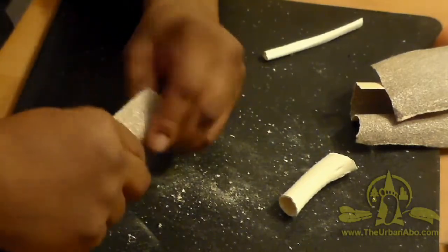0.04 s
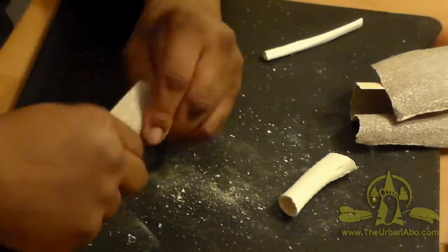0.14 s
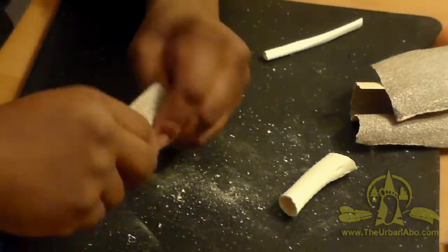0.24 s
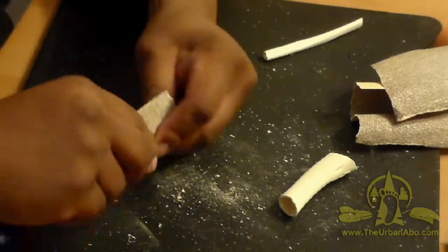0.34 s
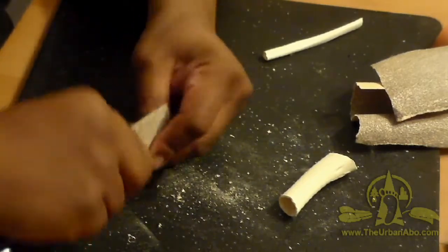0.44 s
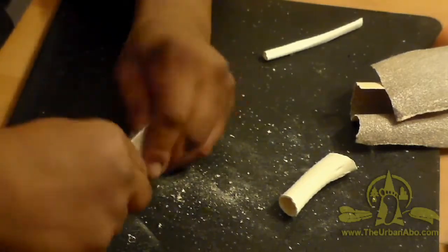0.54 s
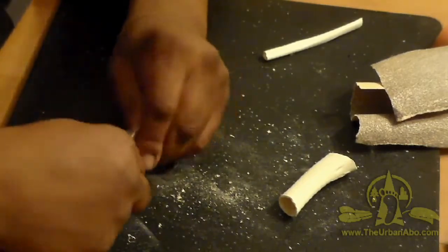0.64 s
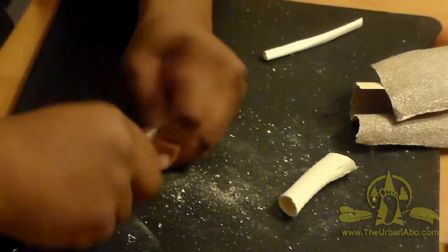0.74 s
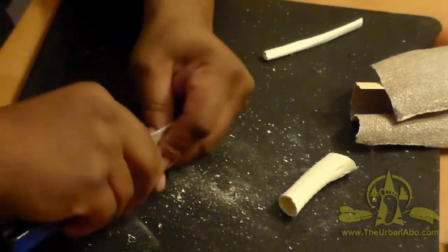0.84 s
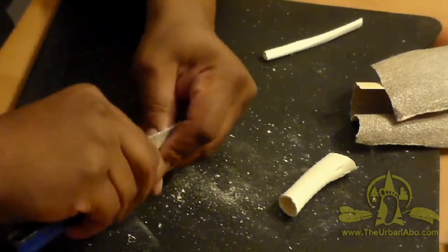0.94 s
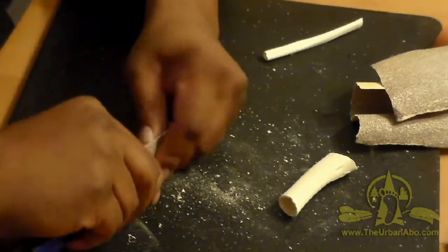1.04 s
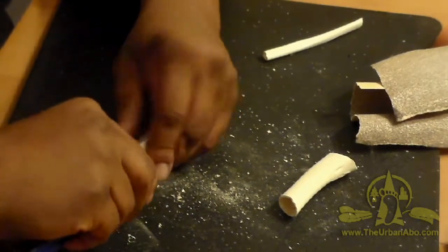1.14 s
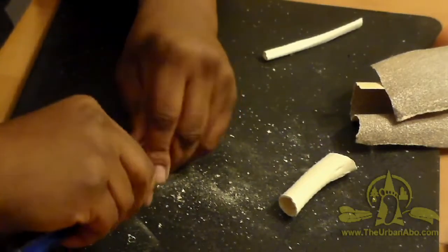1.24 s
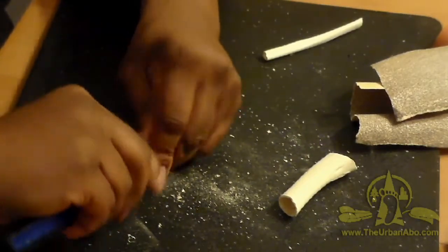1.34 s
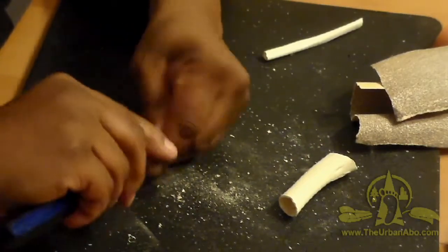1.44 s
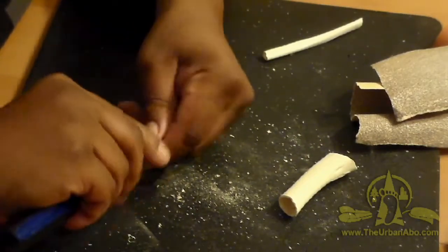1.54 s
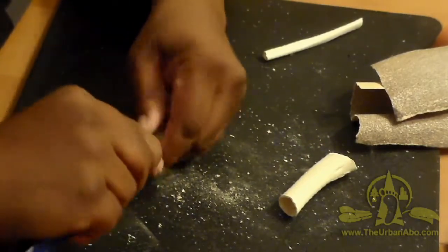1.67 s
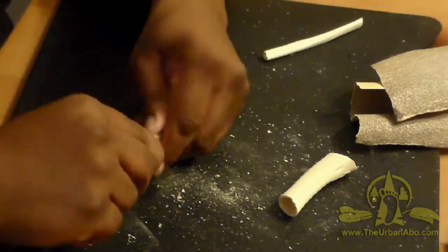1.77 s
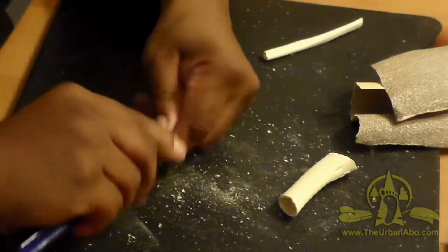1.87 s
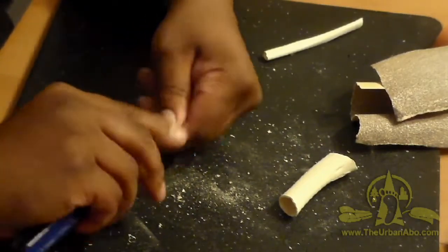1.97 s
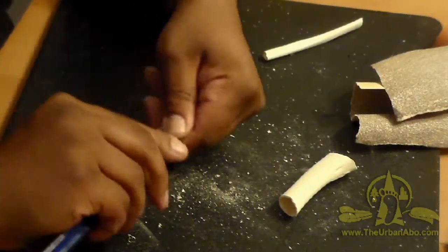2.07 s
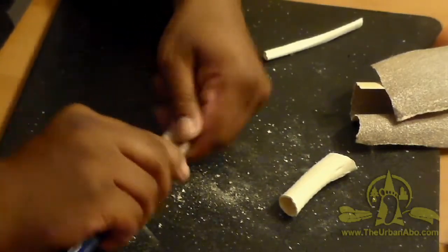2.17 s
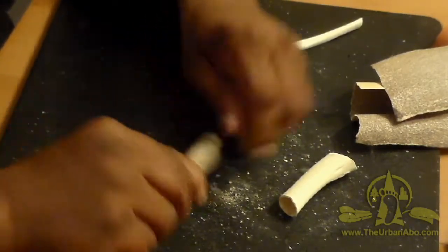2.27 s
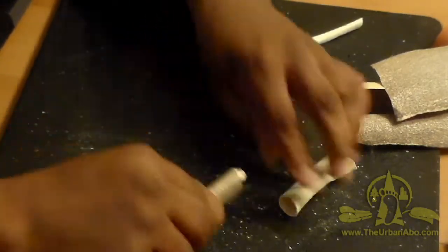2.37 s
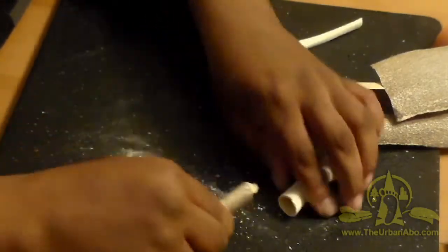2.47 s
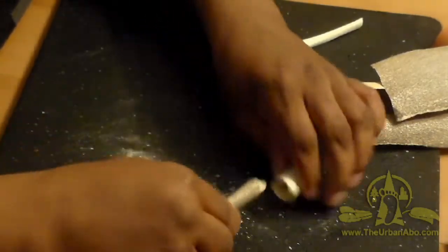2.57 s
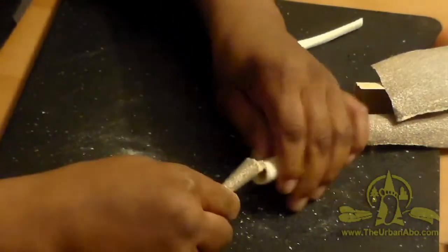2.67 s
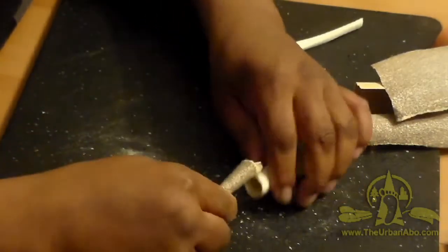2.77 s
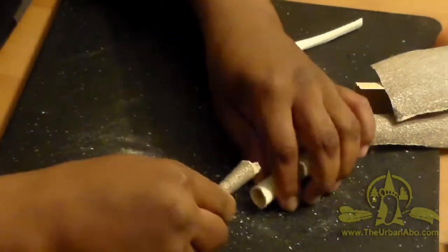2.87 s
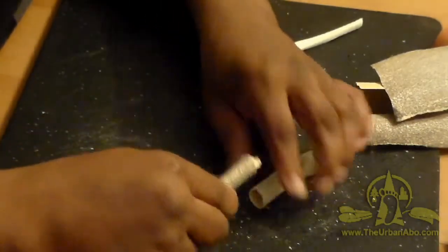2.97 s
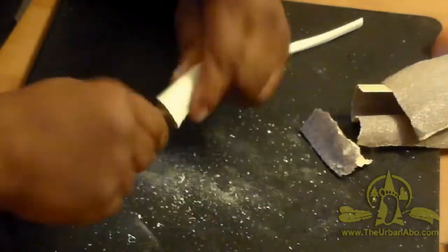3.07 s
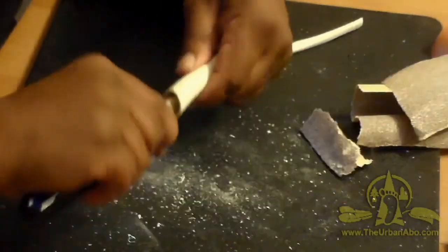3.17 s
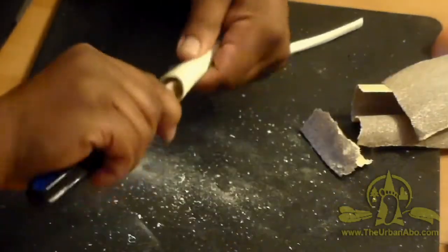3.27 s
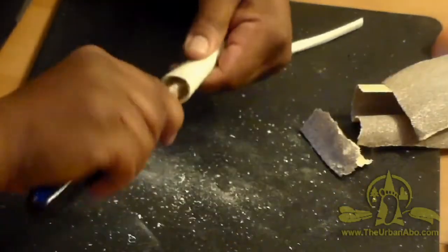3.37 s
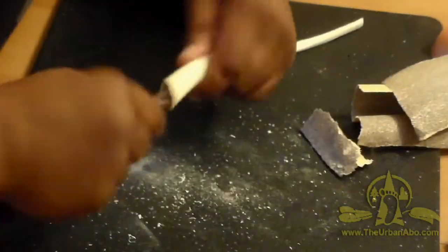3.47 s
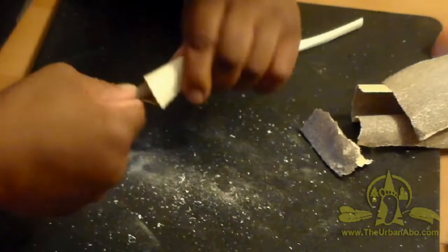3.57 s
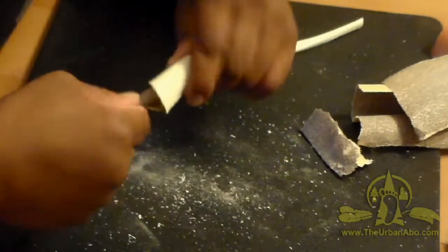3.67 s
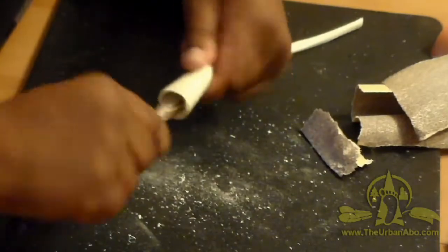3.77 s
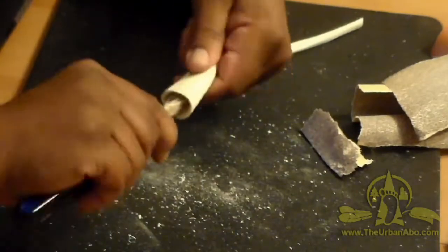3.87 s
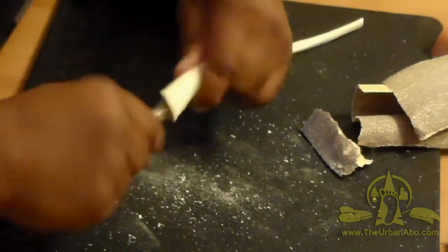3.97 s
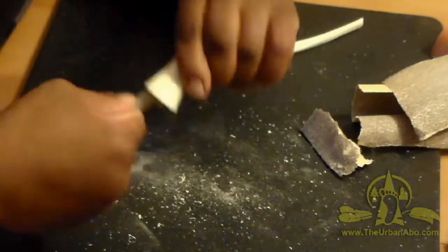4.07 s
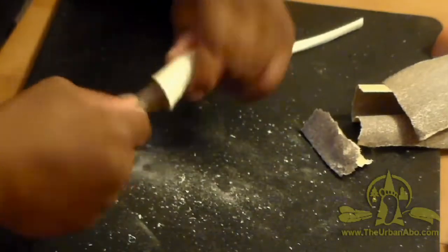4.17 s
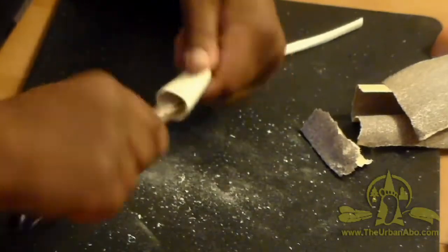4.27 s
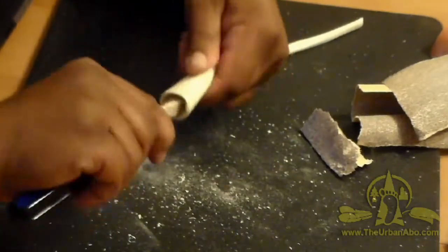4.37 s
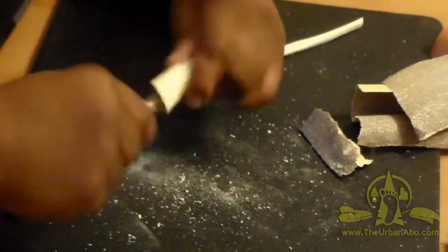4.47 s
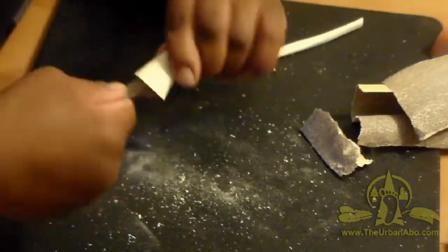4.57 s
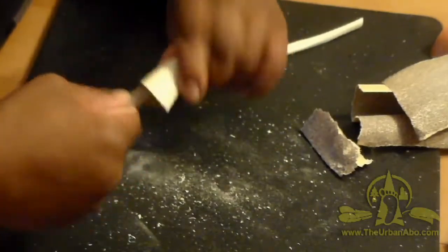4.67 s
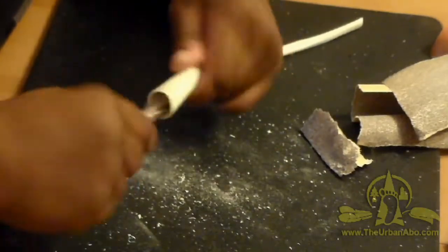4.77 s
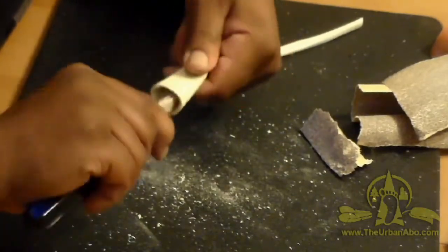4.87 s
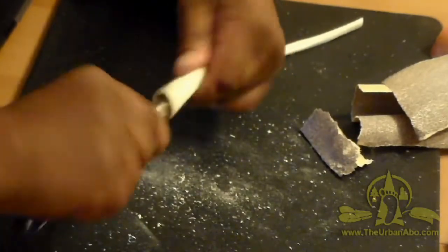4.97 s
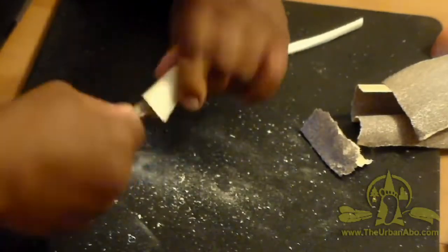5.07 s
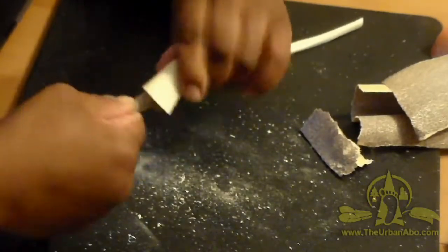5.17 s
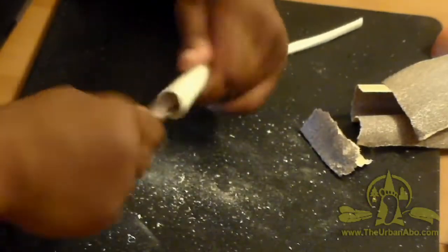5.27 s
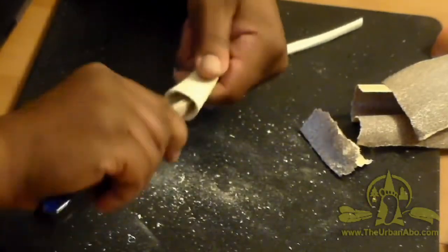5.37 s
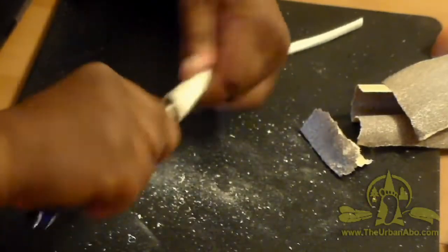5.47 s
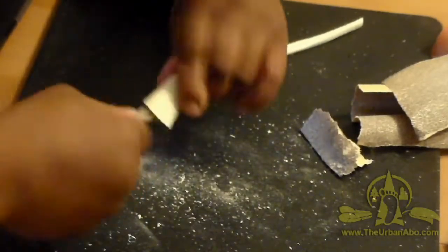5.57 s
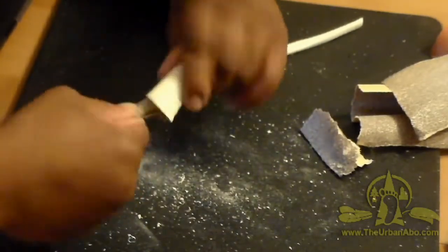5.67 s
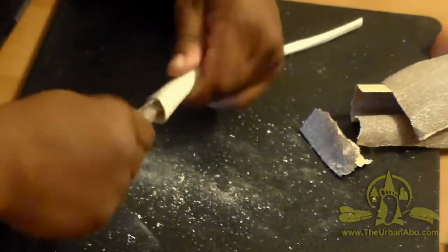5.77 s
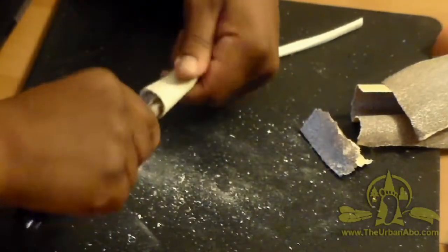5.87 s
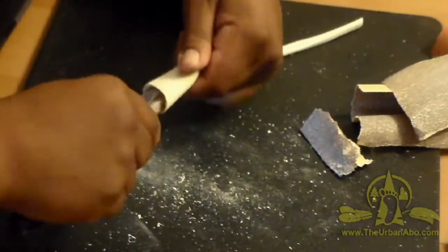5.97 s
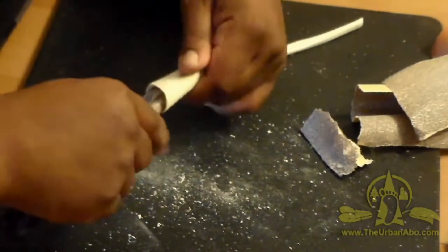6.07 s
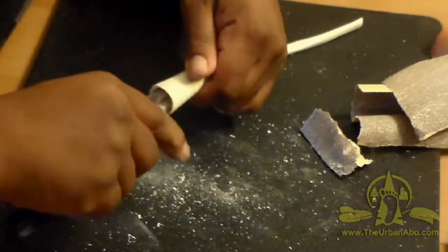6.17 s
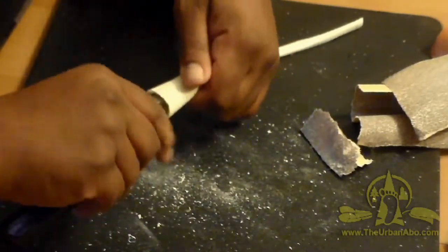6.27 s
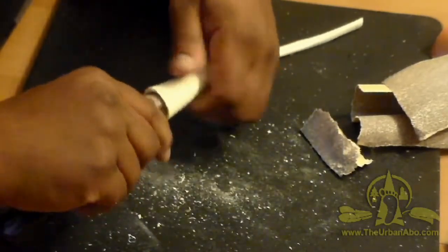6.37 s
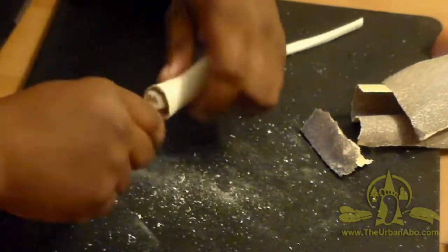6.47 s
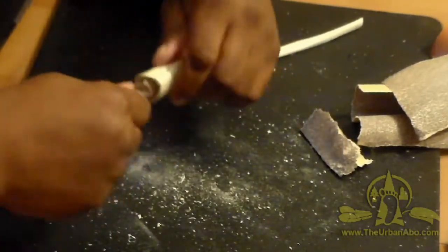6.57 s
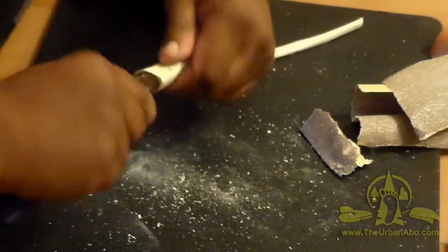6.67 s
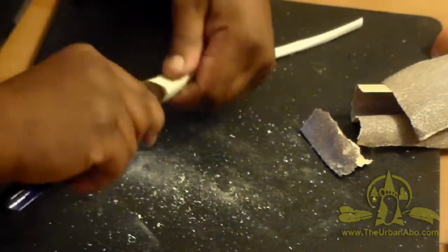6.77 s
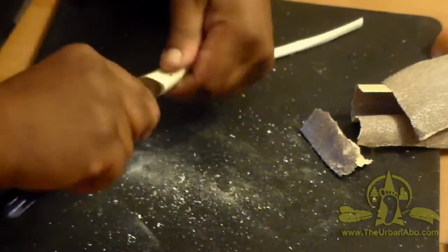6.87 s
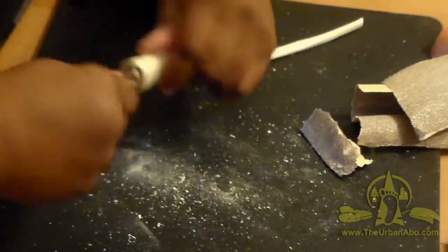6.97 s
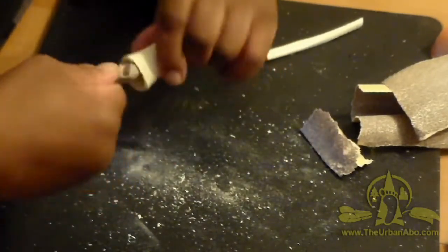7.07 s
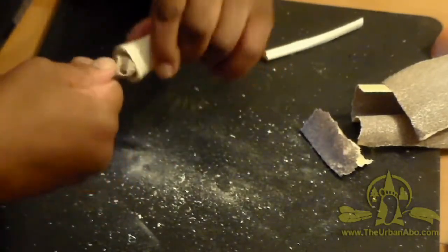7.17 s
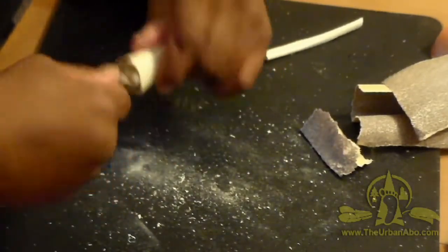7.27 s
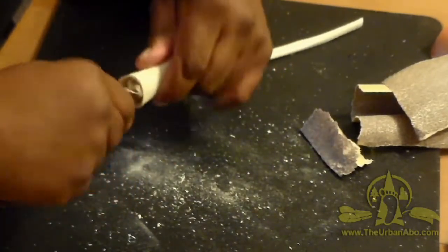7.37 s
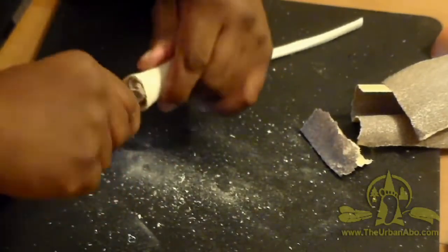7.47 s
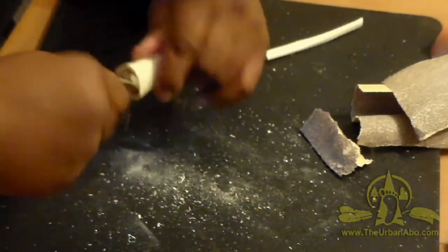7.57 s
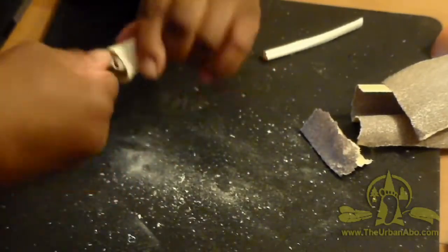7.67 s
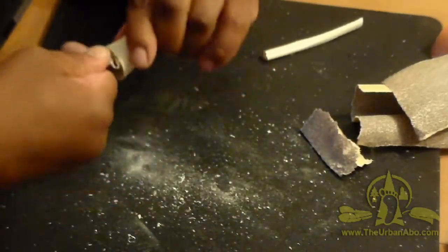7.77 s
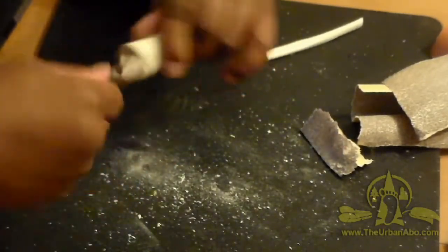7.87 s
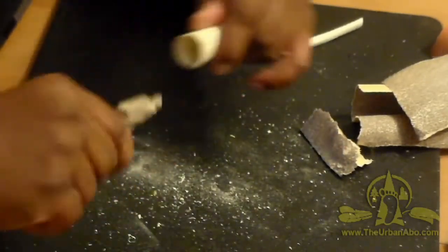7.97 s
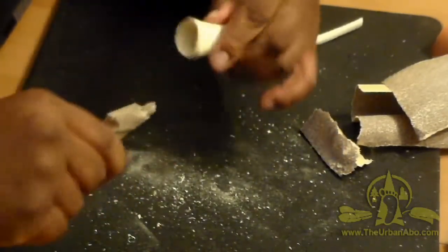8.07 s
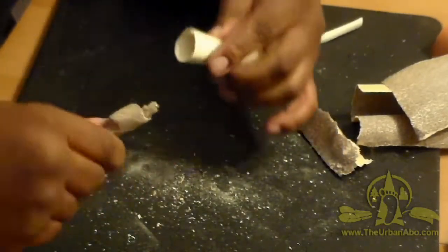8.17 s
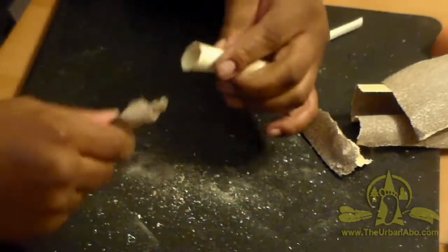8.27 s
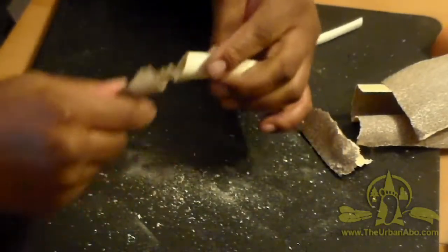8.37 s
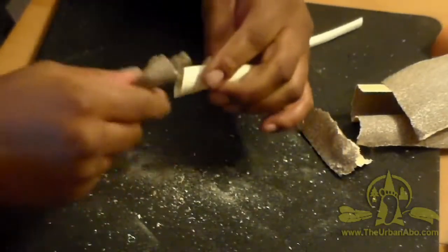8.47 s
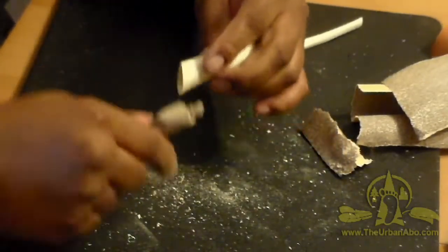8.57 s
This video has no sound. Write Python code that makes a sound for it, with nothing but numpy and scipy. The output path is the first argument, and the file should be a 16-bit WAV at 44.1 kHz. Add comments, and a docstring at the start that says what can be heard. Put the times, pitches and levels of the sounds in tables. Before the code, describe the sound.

Over steady faint room noise and low hum, gritty paper is rolled in the hands with soft irregular scrapes and crackly catches. Dull mat bumps and a small tubular slide follow, then a tiny dropout. Louder, fast back-and-forth rasping fills a hollow bone, turning more broken after a regrip before the roll scrapes out. Close stereo microphone, small room.

```python
"""Over steady room noise and appliance hum, hands roll sandpaper round a screwdriver: grit drags and catches, bumping the mat.
Low scuffs of paper on fingers follow, then a hollow bone slides and lifts off the mat; an edit leaves a short silence.
Then quick strokes rasp the bore, regripped late; a faint hollow tone swells twice and the roll pulls out at the end.
Grit is noise shaped by stroke, grain and catch envelopes, then by body resonances; a small room answers."""
import sys
import numpy as np
from scipy import signal
from scipy.fft import rfft, irfft
from scipy.io import wavfile
from scipy.ndimage import uniform_filter1d, map_coordinates

SR = 44100
rng = np.random.default_rng(int(sys.argv[2]) if len(sys.argv) > 2 else 0)


def gain_from_db(level_db):
    """Convert decibel levels to linear amplitude factors (20 dB per decade)."""
    decades = np.asarray(level_db, float) / 20
    return 10 ** decades


def transcribe(signal):
    """Save signal, clipped to [-1, 1], as a 16-bit WAV file at the path in sys.argv[1]."""
    frames = np.atleast_2d(signal).T
    limited = np.clip(frames, -1, 1)
    pcm = np.round(limited * 32767).astype(np.int16)
    wavfile.write(sys.argv[1], SR, pcm)


N = 381024
MUTE_FROM_S, MUTE_TO_S = 3.066, 3.102  # silence left by the edit


def along(points, hz):
    """(Hz, value) points read on a log-frequency axis."""
    f, v = np.transpose(points)
    return np.interp(np.log(hz + 1), np.log(f + 1), v)


def curves(rows):
    """One value per sample for each column after the time, silent outside the rows."""
    s, *cols = np.transpose(rows)
    t = np.arange(N) / SR
    return [np.interp(t, s, col, left=-120, right=-120) for col in cols]


def wobble(knots_per_s):
    """A smooth random curve: a spline through normal draws."""
    knots = rng.standard_normal(int(N * knots_per_s / SR) + 4)
    return map_coordinates(knots, [np.arange(N) * knots_per_s / SR])


def coloured(x, colour_db):
    """Minimum-phase filter of the given dB curve that keeps the power of white noise."""
    size = 8192
    db = np.maximum(colour_db(np.fft.rfftfreq(size, 1 / SR)), -120)
    cepstrum = irfft(db * np.log(10) / 20)
    cepstrum[1:size // 2] *= 2  # fold to causal
    cepstrum[size // 2 + 1:] = 0
    answer = irfft(np.exp(rfft(cepstrum)))
    return signal.oaconvolve(x, answer / np.linalg.norm(answer))[:N]


def body(spectrum, modes):
    """Colour of a vibrating body: a broad spectrum with resonance humps on it."""
    def colour_db(hz):
        humps = sum(db / (1 + (2 * (hz - centre) / width) ** 2) for centre, width, db in modes)
        return along(spectrum, hz) + humps
    return colour_db


def bursts(times_s, dbs, t60_s):
    """An envelope that jumps at each time and dies away exponentially."""
    kicks = np.bincount(np.round(np.multiply(times_s, SR)).astype(int), gain_from_db(dbs), N)
    return signal.lfilter([1], [1, -gain_from_db(-60 / (t60_s * SR))], kicks)


# broad spectrum of the room noise: (frequency [Hz], relative level [dB])
AIR_SPECTRUM = [(8, -20.5), (40, -7.5), (90, -15), (240, -24), (900, -30.5), (14000, -37.5)]
# left-right likeness of the room noise: (frequency [Hz], correlation [0-1])
AIR_LIKENESS = [(30, 0.85), (130, 0.56), (1000, 0.28), (8000, 0.03)]
# mains and motor tones: (frequency [Hz], rms level [dB])
HUM_TONES = [(30, -56), (60, -63.5), (240, -77)]


def air():
    """Room noise, alike in both ears mostly in the bass, plus hum unsteady in level and phase."""
    hz = np.fft.rfftfreq(N, 1 / SR)
    turn = np.arccos(np.clip(along(AIR_LIKENESS, hz), 0, 1)) / 2
    noise = rfft(rng.standard_normal((2, N))) * gain_from_db(along(AIR_SPECTRUM, hz))
    mid, side = irfft(noise * [np.cos(turn), np.sin(turn)], N)
    hiss = np.array([mid + side, mid - side])
    hiss = gain_from_db(-55 + 1.5 * wobble(2.5)) * hiss / np.std(hiss)
    t = np.arange(N) / SR
    hum = np.zeros(N)
    for f, db in HUM_TONES:
        peak = np.sqrt(2) * gain_from_db(db + 2.2 * wobble(5))
        hum += peak * np.sin(2 * np.pi * f * t + .9 * wobble(7))
    return hiss + hum


# strokes of the grit: (start [s], swell [s], fade [s], peak level [dB], treble above the drag [dB])
GRIT_STROKES = [(-.2, 0.26, 0.66, -52.5, -0.5), (0.241, 0.058, 0.11, -44, 5), (0.479, 0.0076, 0.53, -53, 3),
                (.8, 0.15, 1, -58.5, 3.5), (1.048, 0.15, 0.16, -44.5, 1), (1.3, 0.13, 0.39, -49, 4),
                (1.7, 0.028, 0.18, -42, 0.5), (1.81, 0.071, 0.27, -53.5, -3), (1.98, 0.05, 0.54, -59, -3.5),
                (2.27, 0.078, 0.14, -47, -2), (3.201, 0.11, 0.12, -35.5, 0.5),
                (3.39, 0.043, 0.17, -45, -3.5), (3.552, 0.13, 0.26, -40, 1.5),
                (3.803, 0.12, 0.15, -30, -1.5), (4.059, 0.15, 0.057, -32.5, -1),
                (4.267, 0.043, 0.14, -28, 0), (4.344, .02, 0.2, -28, -0.5), (4.576, 0.061, 0.18, -30.5, 1),
                (4.828, 0.064, 0.24, -30, 1.5), (5.101, .13, 0.13, -35, -1.5),
                (5.332, 0.095, 0.15, -29, -2.5), (5.606, 0.1, 0.14, -33, -3),
                (5.814, 0.12, 0.031, -35.5, 3), (5.962, 0.044, 0.25, -34, -3),
                (6.378, 0.005, 0.18, -40.5, -8.5), (6.49, 0.045, 0.11, -52, -4),
                (6.62, 0.04, 0.1, -50, -5.5), (6.732, 0.0098, 0.3, -33.5, -5),
                (7.076, 0.026, 0.41, -40.5, -5.5), (7.131, 0.1, 0.21, -39.5, -11),
                (7.318, 0.037, 0.31, -34.5, -8), (7.481, 0.03, 0.22, -49, 9),
                (7.726, 0.078, 0.27, -33.5, -7), (7.966, 0.065, 0.12, -29.5, 1)]


def strokes():
    """Drag on the body and on its treble: a stroke touches, swells ever slower to its peak, fades."""
    touch_s, bite_db, swell_curve, fade_db = 0.008, 10, 1.5, 31.5  # starts bite_db under its peak
    t = np.arange(0, N / SR, .001)
    drag = np.zeros((2, len(t)))
    for start, swell, fade, peak_db, treble_db in GRIT_STROKES:
        rising = np.clip(1 - (t - start) / swell, 0, 1) ** swell_curve
        fading = np.maximum(t - start - swell, 0) / fade
        touch = np.clip((t - start) / touch_s, 0, 1)
        stroke = touch * gain_from_db(peak_db - bite_db * rising - fade_db * fading)
        drag += stroke * gain_from_db([[0], [treble_db]])
    return [np.interp(np.arange(N) / SR, t, d) for d in drag]


def grit(grains_per_s, spread_db, t60_s, smooth):
    """Envelope of rms 1: grains of uneven size tear loose at random over a smooth drag."""
    grains = rng.random((round(grains_per_s * N / SR), 2))
    times_s = grains[:, 0] * (N - 1) / SR
    sizes_db = -spread_db * np.log(grains[:, 1] + .04)
    tears = smooth + bursts(times_s, sizes_db, t60_s)
    return tears / np.sqrt(np.mean(tears ** 2))


# grit catching and letting go: (time [s], peak level [dB], treble peak level [dB])
GRIT_CATCHES = [(0.054, -45.5, -55), (0.134, -39, -37), (0.2408, -26, -20), (0.291, -42, -29.5),
                (0.804, -52, -31.5), (0.557, -48, -62), (0.593, -44, -54), (0.897, -37, -40),
                (1.065, -31, -33), (1.101, -40, -30), (1.165, -33.5, -44), (1.2457, -42, -31.5),
                (1.326, -32.5, -38), (1.694, -35, -28), (1.845, -34, -32), (2.008, -48, -44),
                (2.2517, -38, -31.5), (2.347, -45, -44), (3.203, -46, -39), (3.255, -21, -27),
                (3.278, -35, -25), (3.4046, -25.5, -23.5), (3.6281, -23.5, -33), (3.751, -33, -25),
                (3.871, -30, -40), (3.93, -34, -34), (4.059, -23, -32), (4.097, -20.5, -20),
                (4.129, -24, -26), (4.348, -36, -24), (4.535, -28, -28), (4.582, -18.5, -26),
                (4.667, -40, -15.5), (4.9599, -31, -19.5), (5.152, -28.5, -53), (5.232, -88, -29),
                (5.3937, -20, -19), (5.6678, -22, -18.5), (5.739, -31, -22), (5.982, -71, -24),
                (5.9978, -18, -18), (6.1562, -53, -35.5), (6.5144, -42, -33.5), (6.7347, -39, -32),
                (6.7642, -51, -33), (6.7892, -16.5, -15.5), (6.8213, -28, -22.5), (6.8641, -17, -17.5),
                (7.092, -34, -37), (7.456, -26, -23.5), (7.4931, -26, -15), (7.513, -27, -16.5),
                (7.785, -43, -30), (7.842, -32, -23), (8.01, -26, -35)]


def rubbing():
    """Drive on the body and its treble: drag roughened by loose grains, plus quickly dying catches."""
    drag, sharp_drag = strokes()
    s, low_db, high_db = np.transpose(GRIT_CATCHES)
    rough = grit(280, spread_db=4, t60_s=.008, smooth=1.1)
    fine = grit(300, spread_db=3.5, t60_s=0.0028, smooth=1.0)
    low = drag * rough + bursts(s, low_db, t60_s=0.034)
    high = sharp_drag * rough * fine + bursts(s, high_db, t60_s=.014)
    return low, high


def patchy(x, hz_wide, seconds, depth_db):
    """The colour wanders as the contact point moves: random gain in patches of pitch and time."""
    z = signal.stft(x, nperseg=256)[2]
    field = uniform_filter1d(rng.standard_normal(z.shape), max(1, round(hz_wide * 256 / SR)), 0)
    field = uniform_filter1d(field, max(1, round(seconds * SR / 128)), 1)
    return signal.istft(z * gain_from_db(depth_db * field / np.std(field)), nperseg=256)[1][:N]


# loose paper, broad colour: (frequency [Hz], relative density [dB])
PAPER_COLOUR = [(240, -37), (400, -23.5), (1150, -17), (2150, 3.5), (3700, -5.5), (14000, -13.5)]
# paper resonance: (frequency [Hz], width [Hz], lift [dB])
PAPER_HUMPS = [(7000, 1000, 5)]
# bone in the first grip, broad colour: (frequency [Hz], relative density [dB])
BONE_COLOUR = [(250, -24.5), (1150, -14.5), (1600, -3.5), (3000, -9), (6900, -16), (14000, -23)]
# bone in the new grip, broad colour: (frequency [Hz], relative density [dB])
REGRIPPED_COLOUR = [(250, -27), (1250, -12.5), (1600, -3), (3300, -6.5), (6000, -9), (14000, -16)]
# bone resonances: (frequency [Hz], width [Hz], lift [dB])
BONE_HUMPS = [(1793, 340, 7.3), (2666, 510, 8.8), (3475, 260, 7.65), (4210, 180, 4.9), (6640, 1050, 4.7)]


def rasp(low, high):
    """Grit shakes paper, then bone, then bone regripped, then the emptying bore, which adds a hump."""
    split_hz, regrip_s, pull_out_s = 3800, 6.3, 7.96
    shake = patchy(rng.standard_normal(N), hz_wide=1500, seconds=.012, depth_db=2.5)
    shake = patchy(shake, hz_wide=500, seconds=.15, depth_db=2.6)
    open_bore = [(3770, 1100, 7.9)]  # (frequency [Hz], width [Hz], lift [dB])
    colours = [body(PAPER_COLOUR, PAPER_HUMPS), body(BONE_COLOUR, BONE_HUMPS),
               body(REGRIPPED_COLOUR, BONE_HUMPS), body(REGRIPPED_COLOUR, BONE_HUMPS + open_bore)]
    stage = np.searchsorted([MUTE_FROM_S, regrip_s, pull_out_s], np.arange(N) / SR)

    def edge_db(hz, order):
        """Low-pass at the split for order > 0, high-pass for order < 0."""
        return -10 * np.log10(1 + ((hz + 1) / split_hz) ** order)

    out = np.zeros(N)
    for k, colour in enumerate(colours):
        when = stage == k
        out += coloured(when * low * shake, lambda hz: colour(hz) + edge_db(hz, order=12))
        out += coloured(when * high * shake, lambda hz: colour(hz) + edge_db(hz, order=-12))
    return out


# bumps on the mat: (time [s], thud peak level [dB], tube peak level [dB], t60 [s])
MAT_BUMPS = [(0.095, -46.5, -72.5, 0.31), (2.587, -48, -45, 0.031), (2.631, -45, -50, .04),
             (2.75, -40, -43, 0.07), (2.789, -31.5, -68, 0.04), (2.936, -38, -57, 0.073)]
# bone slid and lifted off the mat: (time [s], thud level [dB], tube ring level [dB])
BONE_LIFT = [(2.609, -60, -73), (2.719, -65.5, -59.5), (2.784, -53, -60), (2.908, -57, -54),
             (2.928, -91, -51), (2.958, -42.5, -58), (3.058, -60.5, -84)]
# mat, broad colour: (frequency [Hz], relative density [dB])
MAT_COLOUR = [(60, -51), (110, -4.5), (450, 0), (1300, -5.5), (2300, -13.5), (5000, -21), (6500, -88)]
# open-tube resonances: (frequency [Hz], width [Hz], lift [dB])
TUBE_HUMPS = [(1770, 430, 35), (4320, 200, 20)]


def mat():
    """Dull bumps (a push and a rattle) and sliding; the open tube sings faintly with both."""
    thud_db, ring_db = curves(BONE_LIFT)
    thuds = sum(bursts([s], [db], t60) for s, db, _, t60 in MAT_BUMPS)
    taps = sum(bursts([s], [db], t60) for s, _, db, t60 in MAT_BUMPS)
    rattle = (gain_from_db(thud_db) + thuds) * rng.standard_normal(N)
    push = .5 * thuds
    ring = (gain_from_db(ring_db + 1.8 * wobble(29.63)) + taps) * rng.standard_normal(N)
    return coloured(rattle + push, body(MAT_COLOUR, [])) + coloured(ring, body([(1, -40)], TUBE_HUMPS))


def swells(rows, humps):
    """Noise in a resonance hump over a flat floor, swelling and fading once for each row."""
    t = np.arange(N) / SR
    swell = sum(gain_from_db(db) * np.sin(np.pi * np.clip((t - s) / length, 0, 1)) for s, length, db in rows)
    return coloured(swell * rng.standard_normal(N), body([(1, -40)], humps))


# paper against the fingers: (start [s], length [s], level [dB])
PAPER_SCUFFS = [(1.852, 0.014, -38), (1.884, 0.013, -47), (2.327, 0.049, -44)]
# scuff resonance: (frequency [Hz], width [Hz], lift [dB])
SCUFF_HUMP = [(1330, 560, 15)]


def scuffs():
    """Low scuffs of paper against the fingers: short swells of resonant noise."""
    return swells(PAPER_SCUFFS, SCUFF_HUMP)


# faint hollow tone: (start [s], length [s], level [dB])
HOLLOW_SWELLS = [(3.46, .22, -59), (6.03, 0.25, -57.5)]
# hollow resonance: (frequency [Hz], width [Hz], lift [dB])
HOLLOW_HUMP = [(365, 130, 35)]


def hollow_tone():
    """A faint hollow tone that swells twice: noise in one narrow hump."""
    return swells(HOLLOW_SWELLS, HOLLOW_HUMP)


# room decay: (frequency [Hz], t60 [s])
ROOM_DECAY = [(300, 0.25), (2500, 0.19), (14000, 0.18)]


def echo(x, delay_s):
    """The room's answer: a noise tail, each frequency dying at its own speed."""
    hz, t, z = signal.stft(rng.standard_normal(SR // 2), SR, nperseg=128)
    tail = signal.istft(z * gain_from_db(-60 * t / along(ROOM_DECAY, hz)[:, None]), SR, nperseg=128)[1]
    tail = np.pad(tail / np.linalg.norm(tail), (round(delay_s * SR), 0))
    return signal.fftconvolve(x, tail)[:N]


# side against mid: (frequency [Hz], side gain [dB])
SIDE_WIDTH = [(400, -15.5), (1500, -19.5), (3000, -11.5), (6000, -4), (13000, -3.5)]


def spread(mid, side):
    """A spread source reaches the close ports unalike, mostly in the treble."""
    side = irfft(rfft(side) * gain_from_db(along(SIDE_WIDTH, np.fft.rfftfreq(N, 1 / SR))), N)
    return np.array([mid + side, mid - side])


def scene():
    """Work sounds, drawn apart for mid and side, in the room; then room noise and hollow tone."""
    force = rubbing()
    work = [rasp(*force) + mat() + scuffs() for _ in ("mid", "side")]
    mid, side = [gain_from_db(-1.5) * x + gain_from_db(-8.0) * echo(x, delay_s=.006) for x in work]
    return spread(mid, side) + air() + hollow_tone()


def ducked(x):
    """Gain control: turns down after loud sound by a share of the level over the knee, creeps back."""
    knee_db, share, back_s = -40.5, 0.18, 0.84
    keep = np.exp(-1 / (back_s * SR))
    recent = signal.lfilter([1 - keep], [1, -keep], np.mean(x ** 2, axis=0))
    return x * (1 + recent / gain_from_db(2 * knee_db)) ** (-share / 2)


# port balance: (frequency [Hz], left over right [dB])
PORT_BALANCE = [(1000, 0), (4500, -1), (13000, -1)]


def ports(x):
    """Two unequal microphone ports, each taking half the balance, with a steep band limit."""
    hz = np.fft.rfftfreq(N, 1 / SR)
    gain = gain_from_db(along(PORT_BALANCE, hz) * np.array([[.5], [-.5]]))
    return irfft(rfft(x) * gain / (1 + (hz / 14300) ** 90), N)


def low_pass(x):
    """Removes everything above the highest recorded frequency."""
    return signal.sosfilt(signal.butter(12, 15480, fs=SR, output="sos"), x)


def record(dry):
    """Gain control, microphone ports, then the edit's silence with 0.38 ms edges."""
    heard = ports(ducked(dry))
    t = np.arange(N) / SR
    kept = np.clip(np.maximum(MUTE_FROM_S - t, t - MUTE_TO_S) / 0.00038, 0, 1)
    return low_pass(heard * kept)


dry = scene()
out = record(dry)
transcribe(out)
```